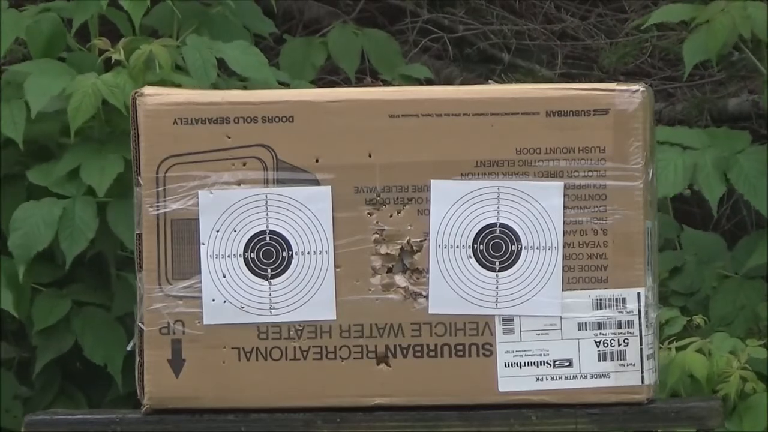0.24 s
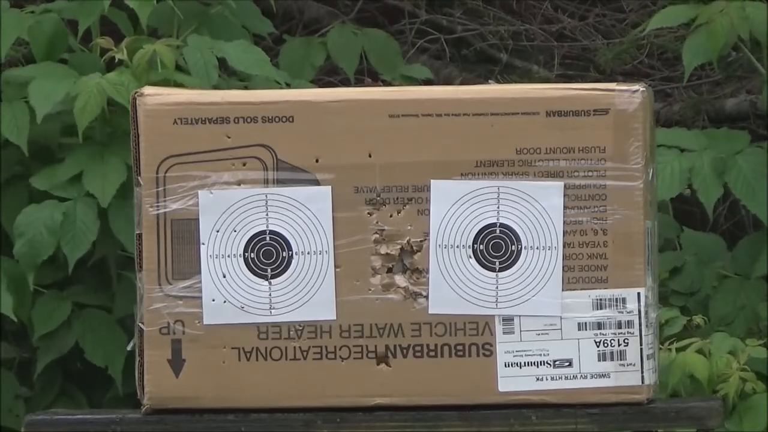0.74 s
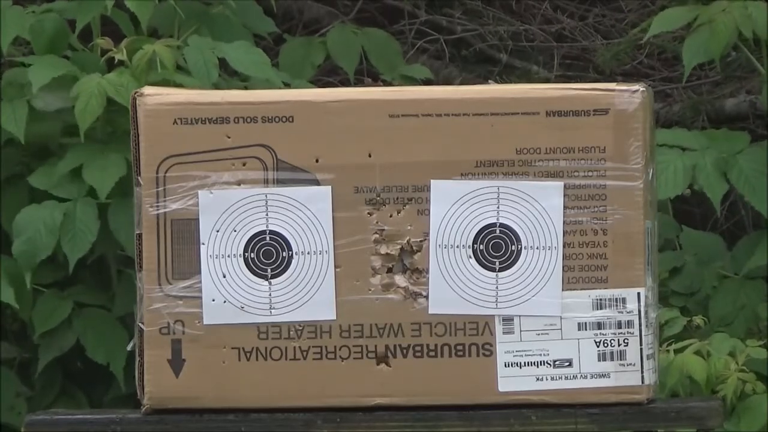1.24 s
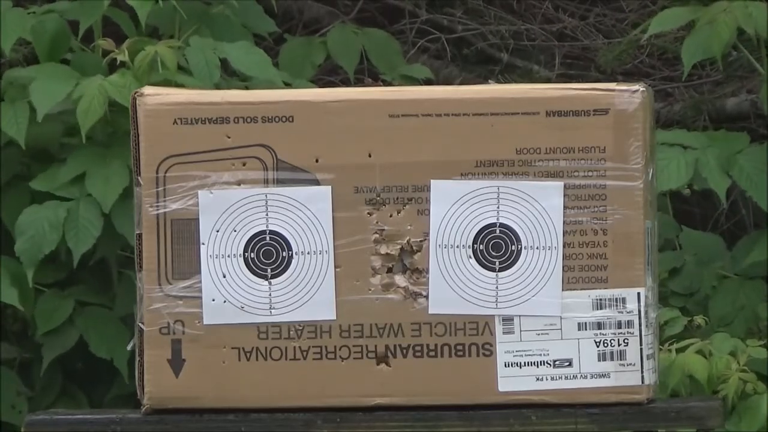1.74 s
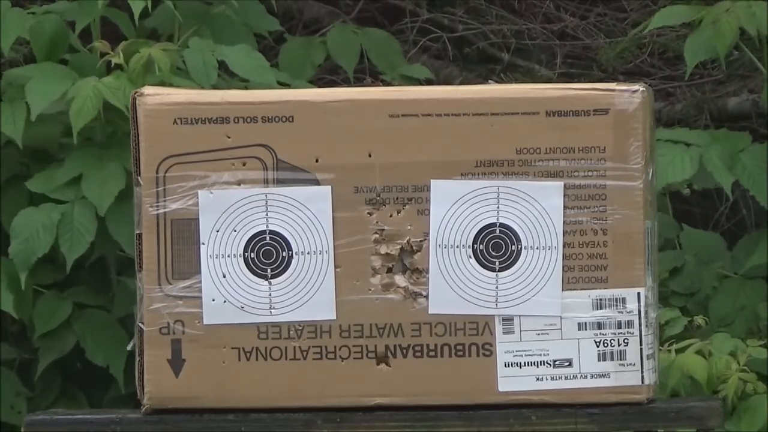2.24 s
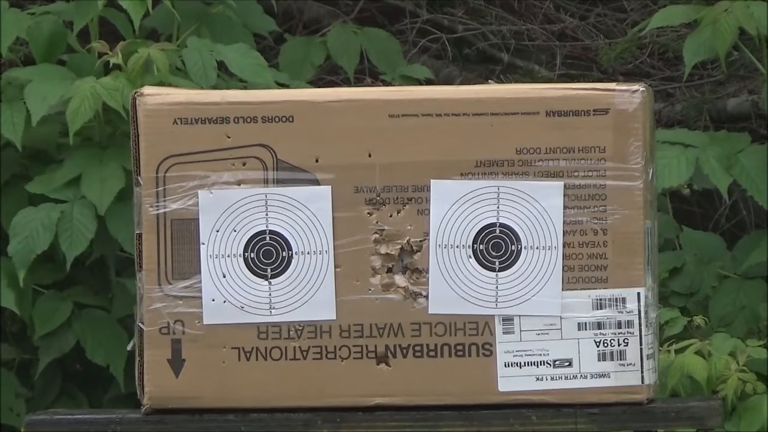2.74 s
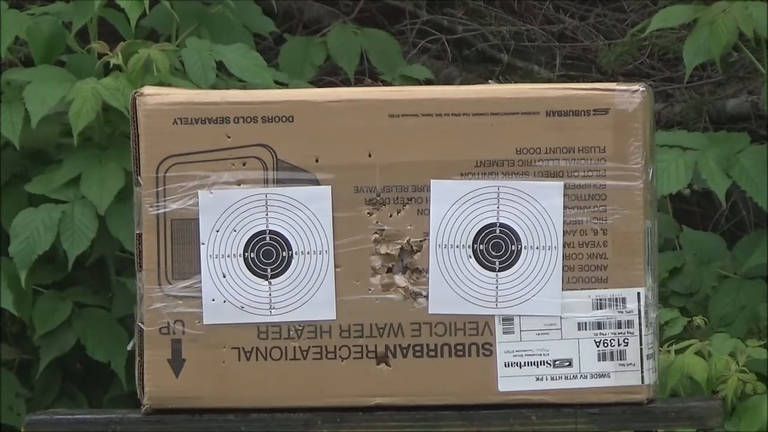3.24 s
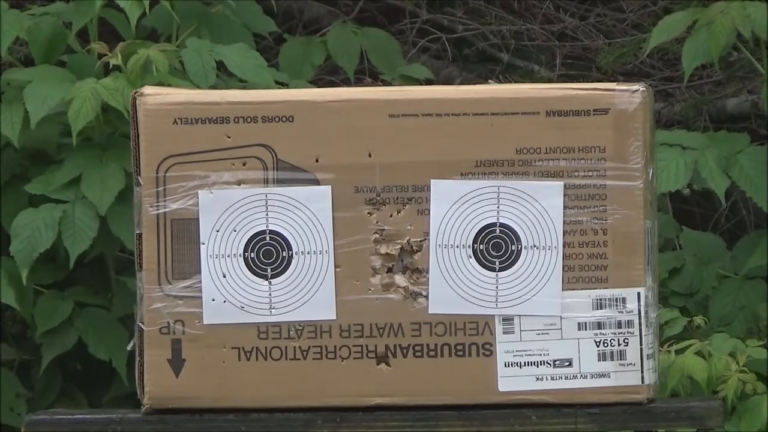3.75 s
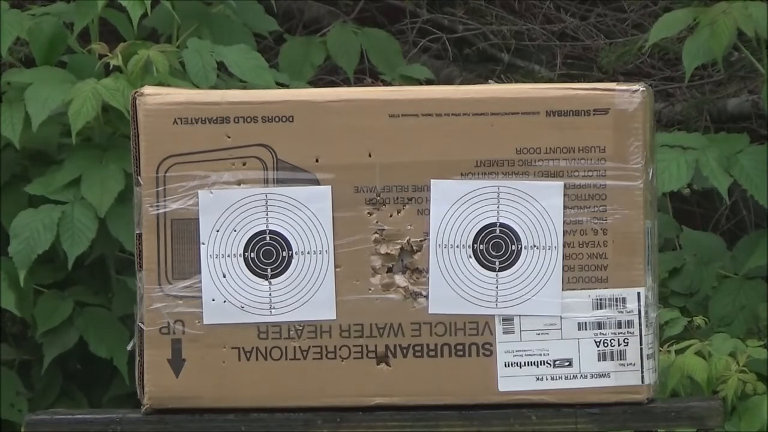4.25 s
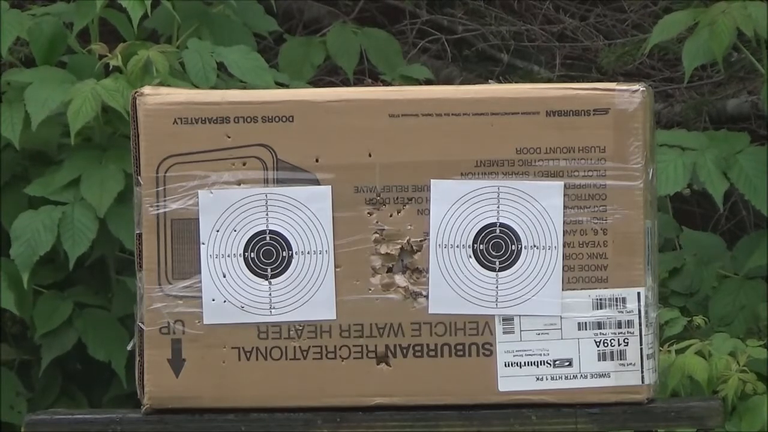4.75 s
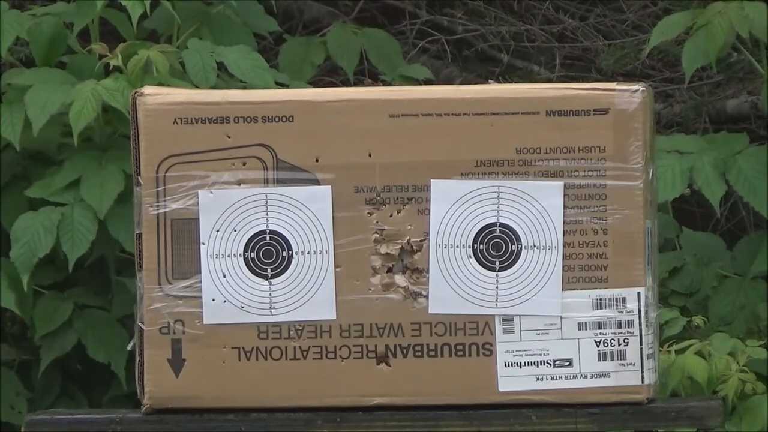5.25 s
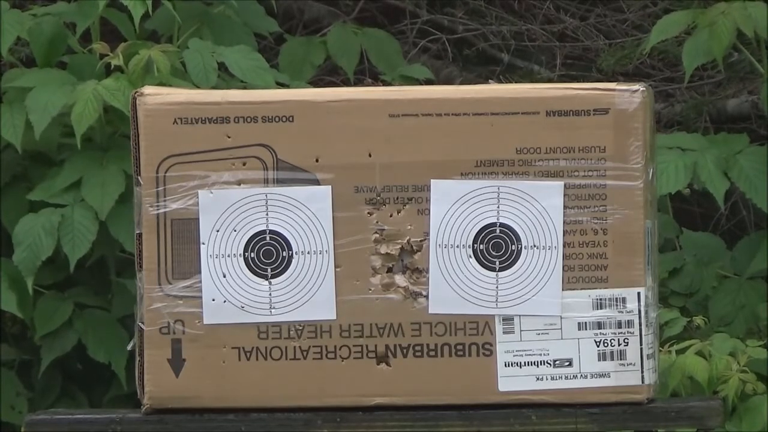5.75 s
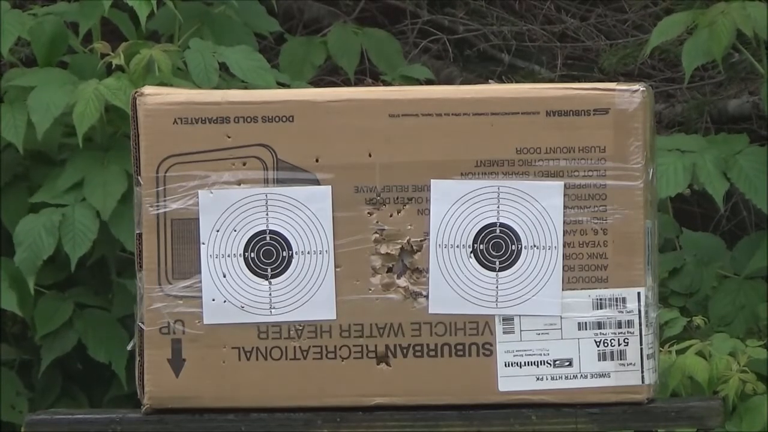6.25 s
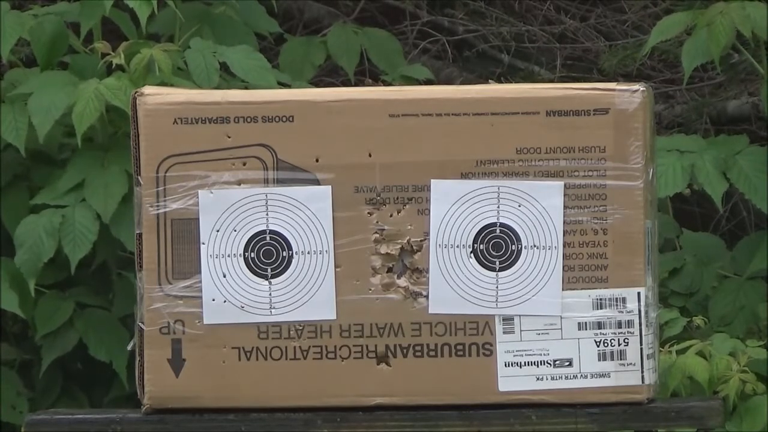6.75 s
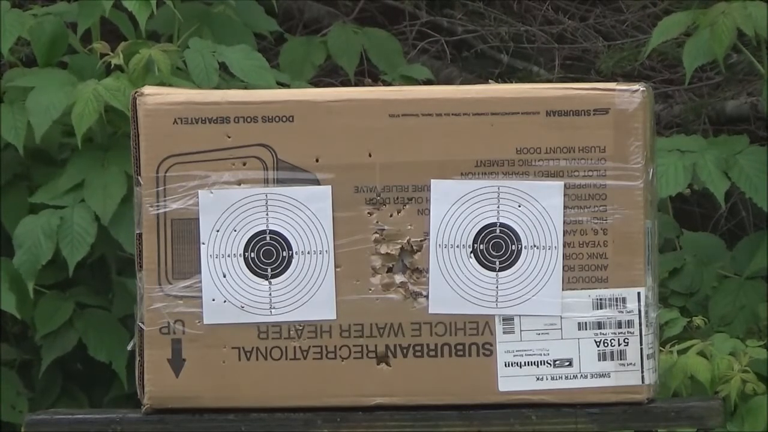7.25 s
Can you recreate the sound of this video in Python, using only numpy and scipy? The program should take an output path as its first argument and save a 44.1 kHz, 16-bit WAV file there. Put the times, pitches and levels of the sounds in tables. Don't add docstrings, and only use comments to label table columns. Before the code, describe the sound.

Outdoors, six sharp air rifle cracks, each after a small trigger click, most followed instantly by a pellet smacking a hollow cardboard box.

```python
import sys
import numpy as np
from scipy import signal
from scipy.fft import rfft, irfft, next_fast_len
from scipy.io import wavfile
from scipy.ndimage import uniform_filter1d

SR = 44100
rng = np.random.default_rng(int(sys.argv[2]) if len(sys.argv) > 2 else 0)


def put_to_file(sound):
    columns = np.atleast_2d(sound).T
    safe = np.clip(columns, -1, 1)
    whole_steps = np.round(safe * 32767)
    wavfile.write(sys.argv[1], SR, whole_steps.astype(np.int16))


def voltage_ratio(level):
    return 10 ** (np.asarray(level, float) / 20)


N = 331191
LEAD_S = .25


def unit(x):
    return x / np.sqrt(np.mean(x ** 2) + 1e-20)


def along(points, hz):
    point_hz, value = np.transpose(points)
    return np.interp(np.log(hz + 1), np.log(point_hz + 1), value)


def filtered(x, response):
    size = next_fast_len(x.shape[-1] + 2048, real=True)
    spectrum = rfft(x, size) * response(np.fft.rfftfreq(size, 1 / SR))
    return irfft(spectrum, size)[..., :x.shape[-1]]


def rung(x, modes, sign=-1):
    def ring(hz):
        total = 0
        for k, (mode_hz, width_hz, db) in enumerate(modes):
            damping = 1j * hz * width_hz
            total = total + sign ** k * voltage_ratio(db) * damping / (mode_hz ** 2 - hz ** 2 + damping)
        return total
    peak = np.abs(filtered(np.eye(1, 256)[0], ring)).max()
    return filtered(x, ring) / peak


def add(track, s, sound):
    spot = track[..., round((s + LEAD_S) * SR):][..., :sound.shape[-1]]
    spot += sound[..., :spot.shape[-1]]


# time in seconds, strength in dB.
SHOT_EVENTS = [
    (-.135, 2),
    (1.5880, -2),
    (2.5828, -0.5),
    (3.623, -1),
    (6.0714, -1),
    (6.7465, 0),
    (7.4137, 0),
]
# delay in ms, crack in dB, thump in dB, hiss in dB, hiss decay (t60) in ms.
FIRING_CYCLE = [
    (-10, -25, -32.5, -29.5, 130),
    (0.5, -6.5, -38.5, -20.5, 57),
    (2.5, -20.5, -21, -29, 25),
    (6, 0, -12.5, -19, 21),
    (8, -8.5, -16, -21.5, 15),
    (12, -5.5, -23.5, -18.5, 19),
    (12.5, -14, -39.5, -29.5, 21),
    (17, -15, -28, -28.5, 30),
    (27.5, -15, -16.5, -35, 23),
    (37, -24, -32, -25, 23),
]
# frequency in Hz, width in Hz, level in dB.
MUZZLE_MODES = [(5590, 1430, -2.5), (7970, 1600, 1), (10420, 1620, -1.5), (14000, 3000, -25.5)]
# frequency in Hz, width in Hz, level in dB.
BODY_MODES = [(603, 114, -0.5), (1450, 360, -0.5), (2310, 340, -1.5), (3030, 500, -3.5)]
# frequency in Hz, density in dB per Hz.
GAS_SPECTRUM = [(88, -66.5), (150, -29.5), (583, -8.5), (669, -8.5), (972, -3.5), (2650, -5.5),
                (3930, -7.5), (9150, -3), (15300, -27), (16500, -33.5)]


def rifle(yard):
    size = SR // 8
    t = np.arange(size) / SR
    lead_ms = 12
    for s, db in SHOT_EVENTS:
        crack, thump, hiss_power = np.zeros((3, size))
        for ms, crack_db, thump_db, hiss_db, t60_ms in FIRING_CYCLE:
            k = round((ms + lead_ms) * SR / 1000)
            rattle = 0.25 * rng.standard_normal(40) * voltage_ratio(-60 * t[:40] / 0.0015)
            crack[k:k + 40] += voltage_ratio(crack_db + rng.normal(0, 2.4)) * (np.eye(1, 40)[0] + rattle)
            thump[k] += voltage_ratio(thump_db)
            hiss_power[k:] += voltage_ratio(2 * (hiss_db - 75000.0 * t[:size - k] / t60_ms))
        gas = unit(filtered(rng.standard_normal(size), lambda hz: voltage_ratio(along(GAS_SPECTRUM, hz))))
        near = rung(crack, MUZZLE_MODES) + rung(thump, BODY_MODES) + np.sqrt(hiss_power) * gas
        near = voltage_ratio(db) * near
        start = s - lead_ms / 1000
        add(yard, start, near * voltage_ratio([[.1], [-.1]]))
        add(yard, start, wall(near))
        add(yard, start, scattered(near, db=-10.0, side_db=-6.0, length_s=.7))


# time in seconds, low drum in dB, high drum in dB, paper in Hz, fence answer in dB.
HIT_EVENTS = [
    (-.0368, -7, -9, 4480, -2),
    (1.6867, -10.5, -4, 6000, -2.5),
    (2.6816, -8, -5.5, 5550, -2),
    (3.7222, -6, -7, 9850, -3),
    (6.1723, -4.5, -11, 5360, -4.5),
    (6.8480, -2, -2, 4470, -2),
]
# frequency in Hz, width in Hz.
BOX_MODES = [(270, 170), (1120, 520), (2400, 940)]
# frequency in Hz, width in Hz, level in dB.
CARD_MODES = [(1510, 2230, -2), (6000, 5600, -1.5)]
SMACK_DB = -2.5


def box(yard):
    t = np.arange(1500) / SR
    blow = np.eye(1, 1500)[0]
    for s, low_db, high_db, paper_hz, fence_db in HIT_EVENTS:
        tearing = 0.4 * voltage_ratio(-60 * t / 0.0068) + 0.045 * voltage_ratio(-60 * t / 0.032)
        shreds = rng.standard_normal(1500) * tearing
        second_hz = paper_hz - 4000 * np.sign(paper_hz - 8000)
        smack = rung(blow + shreds, [(paper_hz, 1500, 0), (second_hz, 2400, -6), (13000, 2500, -22)])
        smack = rung(smack, [(6700, 12000, 0)])
        smack = voltage_ratio(SMACK_DB) * smack / np.abs(smack).max()
        levels_db = (low_db - 14, low_db, high_db)
        modes = [(*mode, db) for mode, db in zip(BOX_MODES, levels_db)]
        drum = voltage_ratio(max(low_db, high_db) + 2.0) * rung(blow + 0.11 * shreds, modes, sign=0.83)
        drum = filtered(drum, lambda hz: 1j * hz / (160 + 1j * hz))
        add(yard, s, (smack + drum) * voltage_ratio([[.6], [-.6]]))
        add(yard, s, voltage_ratio(fence_db) * fence(smack + drum))
        around = voltage_ratio((SMACK_DB + high_db) / 2) * rung(blow, CARD_MODES)
        add(yard, s, scattered(around, db=-4.0, side_db=-8.5, length_s=.7))


# time in seconds, peak in dB, knock in dB.
TAKE_UP_EVENTS = [(1.061, -23, -16), (2.2184, -25, -17), (3.4516, -25.5, -16), (5.607, -24, -14.5),
                  (6.6919, -26.5, -15), (7.3477, -25, -17.5)]
# time in seconds, peak in dB, knock in dB.
LET_GO_EVENTS = [(0.112, -29.5, -11), (1.802, -33.5, -9), (2.827, -33, -8), (3.8686, -33.5, -8.5),
                 (6.3175, -40.5, -3), (6.9717, -30, -13.5)]


def trigger(yard):
    clicks(yard, TAKE_UP_EVENTS, spring_db=-11, housing_db=-6.0, rise_ms=4.9, t60_ms=14.2)
    clicks(yard, LET_GO_EVENTS, spring_db=-13.5, housing_db=-8, rise_ms=8.5, t60_ms=25)


# frequency in Hz, width in Hz, level in dB.
SPRING_MODES = [(5560, 430, 1.5), (7570, 950, 0), (9900, 1600, -3), (12500, 1800, -28.5)]
# frequency in Hz, width in Hz, level in dB.
HOUSING_MODES = [(680, 134, -11.5), (1260, 500, -10), (2120, 320, -1.5), (3280, 1700, -10)]


def clicks(yard, events, spring_db, housing_db, rise_ms, t60_ms):
    t = np.arange(2400) / SR - .006
    scrape = voltage_ratio(18600.0 * t / rise_ms - 5.5)
    rattle = voltage_ratio(-60e3 * t / t60_ms) + 0.18 * voltage_ratio(-60 * t / 0.068)
    shape = np.where(t < 0, scrape, rattle)
    for s, db, knock_db in events:
        grit = shape * rng.standard_normal((2, len(t)))
        spring = voltage_ratio(db + spring_db) * rung(grit[0], SPRING_MODES)
        housing = voltage_ratio(db + knock_db + housing_db) * rung(grit[1], HOUSING_MODES)
        click = spring + housing
        add(yard, s - .005, click)
        add(yard, s - .005, voltage_ratio(-3.0) * wall(click))
        add(yard, s - .005, scattered(click, db=-16.0, side_db=-1, length_s=.25))


# delay in ms, level in dB, left minus right in dB.
WALL_ECHOES = [(42.04, -13.5, 5), (64.3, -25, 2)]
# frequency in Hz, gain in dB.
WALL_COLOUR = [(100, -13.5), (700, 3), (1500, 5), (3000, 7), (6000, -9.5), (9500, -0.5), (14000, 6.5)]


def wall(x):
    return echoed(x, WALL_ECHOES, WALL_COLOUR, smear_ms=4.3, rough=0.095)


# delay in ms, level in dB, left minus right in dB.
FENCE_ECHOES = [(14.8, -21, 4), (31.8, -23, 3), (33.5, -17, 2), (35.4, 0.5, 6), (40.1, -4, 5),
                (45.3, -17, 2), (61.4, -17, 2), (74.2, -24.5, -6)]
# frequency in Hz, gain in dB.
FENCE_COLOUR = [(200, -5.5), (500, -12), (1000, -4.5), (2200, 3.5), (3200, -3.5), (5000, -9), (9000, -13),
                (14000, -13)]


def fence(x):
    return echoed(x, FENCE_ECHOES, FENCE_COLOUR, smear_ms=18.3, rough=0.11)


def echoed(x, echoes, colour, smear_ms, rough):
    t = np.arange(400) / SR
    paths = np.zeros((2, SR // 8))
    for ms, db, pan_db in echoes:
        blur = rough * rng.standard_normal((2, 400)) * voltage_ratio(-60e3 * t / smear_ms)
        image = np.eye(1, 400)[0] + blur[0] + .5 * blur[1] * [[1], [-1]]
        gain = voltage_ratio(db + pan_db * np.array([[.5], [-.5]]))
        paths[:, round(ms * SR / 1000):][:, :400] += gain * image
    copies = signal.fftconvolve(x[None], paths, axes=1)
    return filtered(copies, lambda hz: voltage_ratio(along(colour, hz)))


# frequency in Hz, t60 in seconds.
HEDGE_DECAY = [(200, 0.17), (600, 0.44), (1500, 0.45), (4000, 0.34), (10000, 0.18), (16000, 0.16)]
# frequency in Hz, gain in dB.
HEDGE_COLOUR = [(100, -14.5), (500, -9), (1200, -3), (3200, -1.5), (6000, -1), (10000, 2.5), (16000, -6.5)]


def scattered(x, db, side_db, length_s):
    hz, t, z = signal.stft(rng.standard_normal((2, int(length_s * SR))), SR, nperseg=256)
    t60 = along(HEDGE_DECAY, hz)[:, None]
    hedge = voltage_ratio(-60 * t / t60)
    houses = voltage_ratio(-16.5 - 60 * t / (3.35 * t60))
    swell = 1 - 0.6 * np.exp(-t / 0.042)
    fall = (hedge + houses) * swell
    lumps = unit(uniform_filter1d(rng.standard_normal(fall.shape), size=25, axis=0))
    fall = fall * voltage_ratio(3.2 * lumps)
    tail = signal.istft(z * fall * voltage_ratio(along(HEDGE_COLOUR, hz))[:, None], SR, nperseg=256)[1]
    mid, side = tail / np.linalg.norm(tail[0]) * voltage_ratio([[db], [db + side_db]])
    return signal.fftconvolve(x[None], [mid + side, mid - side], axes=1)


# start in seconds, number of chirps.
CRICKET_BOUTS = [
    (.16, 8),
    (2.86, 1),
    (3.33, 9),
    (6.33, 4),
]


def cricket(yard):
    chirp_gap_s, chirp_db = .347, -64
    t = np.arange(2200) / SR
    pulses = np.sin(np.pi * 115 * t) ** 2 * np.sin(np.pi * t / t[-1]) ** .5
    for start, count in CRICKET_BOUTS:
        for k in range(count):
            wing = unit(rung(rng.standard_normal(len(t)), [(8740, 310, 0)]))
            add(yard, start + k * chirp_gap_s, voltage_ratio(chirp_db + rng.normal(0, 1.5)) * pulses * wing)


# time in seconds, level in dB, frequency in Hz.
WIND_PUFFS = [(2.362, -65, 70)]


def puffs(yard):
    t = np.arange(2000) / SR
    for s, db, hz in WIND_PUFFS:
        push = (t / 0.0079) * np.exp(1 - t / 0.0071)
        add(yard, s, voltage_ratio(db) * np.sin(2 * np.pi * hz * t) * push)


# frequency in Hz, density in dB per Hz.
AIR_SPECTRUM = [(20, -30), (60, -26), (120, -14), (220, -7.5), (400, -4), (700, -1), (1200, -2),
                (2000, -4.5), (4000, -7.5), (8000, -12.5), (11000, -14), (15500, -17.5), (16500, -40)]
# frequency in Hz, correlation.
AIR_LIKENESS = [(60, 0.52), (130, 0.79), (290, 0.68), (640, 0.2), (1410, 0.17), (3100, 0.43), (6820, 0.64),
                (15000, .7)]
# frequency in Hz, left minus right in dB.
AIR_LEAN = [(60, -1.5), (240, 0.5), (950, -0.5), (3770, -1.5), (15000, 1.5)]
# time in seconds, level in dB.
AIR_LEVEL = [(0, -57.5), (2, -56.5), (4.7, -57.5), (5.6, -55), (6.5, -57), (7.5, -55.5)]


def air():
    hz, _, z = signal.stft(rng.standard_normal((2, N)), SR, nperseg=1024)
    field = uniform_filter1d(rng.standard_normal(z.shape[1:]), size=12, axis=0)
    field = unit(uniform_filter1d(field, size=7, axis=1))
    turn = np.arccos(np.clip(along(AIR_LIKENESS, hz), -1, 1))[:, None] / 2
    coloured = z * voltage_ratio(along(AIR_SPECTRUM, hz)[:, None] + 0.74 * field)
    mid, side = coloured * [np.cos(turn), np.sin(turn)]
    lean = voltage_ratio(along(AIR_LEAN, hz)[:, None] / 2)
    both = signal.istft([(mid + side) * lean, (mid - side) / lean], nperseg=1024)[1][:, :N]
    return unit(both) * voltage_ratio(np.interp(np.arange(N) / SR, *np.transpose(AIR_LEVEL)))


def scene():
    yard = np.zeros((2, N + round(LEAD_S * SR)))
    for source in (rifle, box, trigger, cricket, puffs):
        source(yard)
    return yard[:, -N:] + air()


# time in seconds, share of treble patches lost.
THINNING = [(0, .4), (2, .22), (3, .03), (4.3, .35), (6.4, .95), (7.5, .9)]


def thinned(x):
    idle, refill_s = .45, .13
    mono_hz, wide_share, most = 7600, .5, .78
    hz, t, z = signal.stft(x, SR, nperseg=1024)
    treble = np.abs(z[:, hz > 10000]).mean(axis=(0, 1))
    busy = treble > voltage_ratio(5) * np.median(treble)
    since = (t - np.maximum.accumulate(t * busy)) / refill_s
    share = np.interp(t, *np.transpose(THINNING)) * (idle + 1.5 * since * np.exp(1 - since) / 2)
    share = np.minimum(share, most) * np.clip((hz[:, None] - 8200) / 2500, 0, 1)
    quiet = np.abs(z).max(axis=(0, 1)) < voltage_ratio(-52)
    mono = (hz[:, None] > mono_hz) & (patches(hz, count=len(t), channels=1) > wide_share * busy)
    emptied = quiet & (patches(hz, count=len(t), channels=2) < share)
    kept = np.where(mono, z.mean(axis=0), z) * ~emptied
    return signal.istft(kept, nperseg=1024)[1][:, :N]


def patches(hz, count, channels):
    band = (hz // 700).astype(int)
    luck = rng.standard_normal((channels + 1, band.max() + 1, count))
    luck = uniform_filter1d(luck, size=5, axis=2)
    luck = luck[1:] + .9 * luck[0]
    rank = luck.argsort(axis=None).argsort().reshape(luck.shape)
    return (rank / luck.size)[:, band]


def low_pass(x):
    return signal.sosfilt(signal.butter(12, 16830, fs=SR, output="sos"), x)


def record(dry):
    band = filtered(dry, lambda hz: 1j * hz / (55 + 1j * hz) * (hz < 15700))
    band = thinned(band)
    full = band / (1 + np.abs(band / .93) ** 8) ** (1 / 8)
    full = filtered(full, lambda hz: np.clip((16900 - hz) / 900, 0, 1) ** 2)
    return low_pass(full)


dry = scene()
out = record(dry)
put_to_file(out)
```